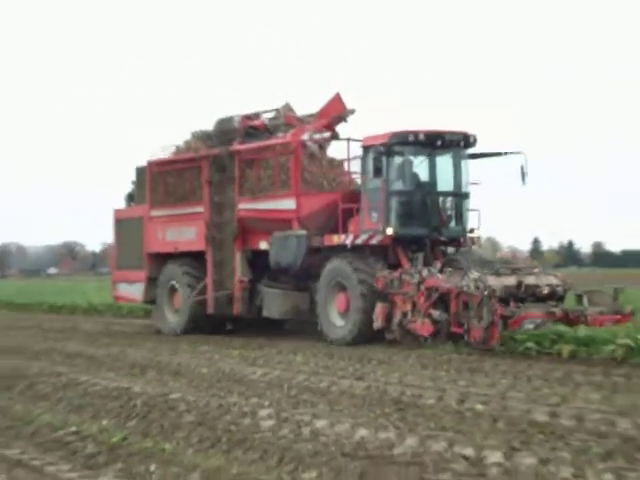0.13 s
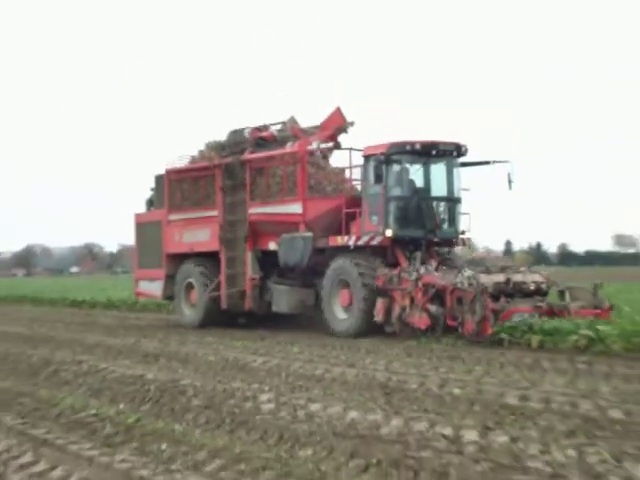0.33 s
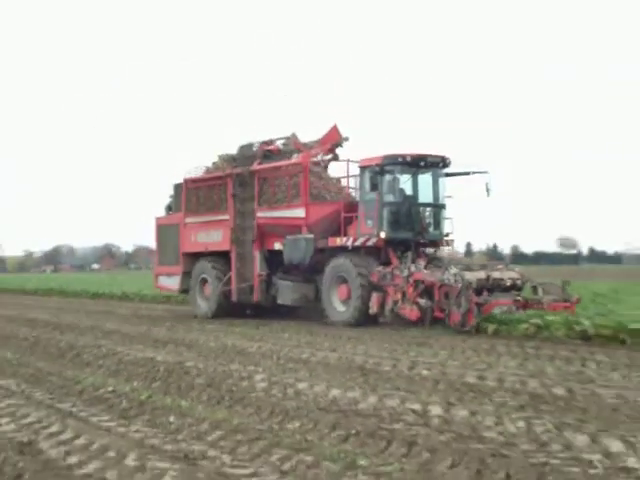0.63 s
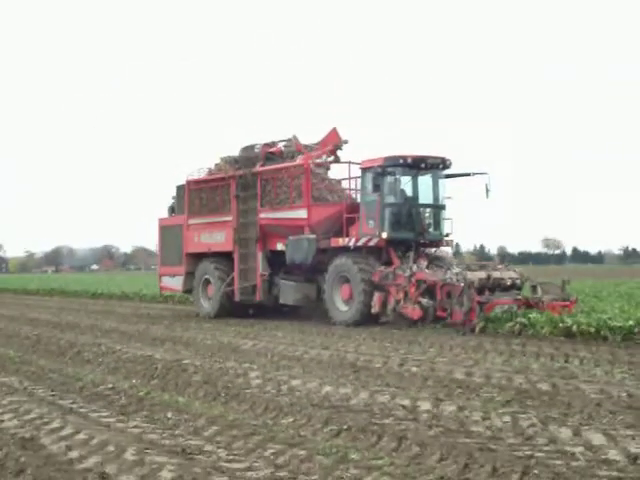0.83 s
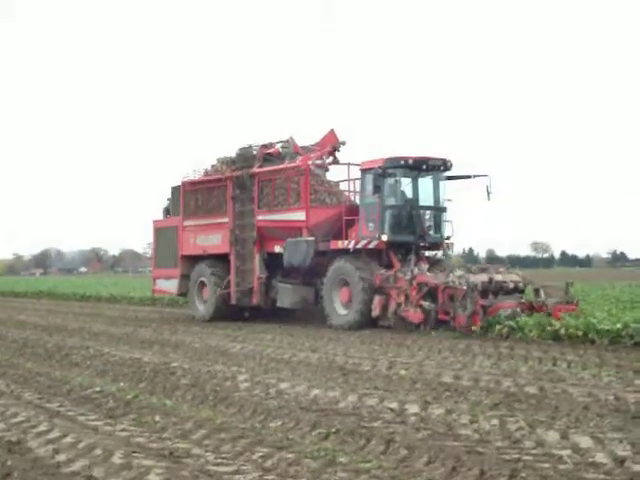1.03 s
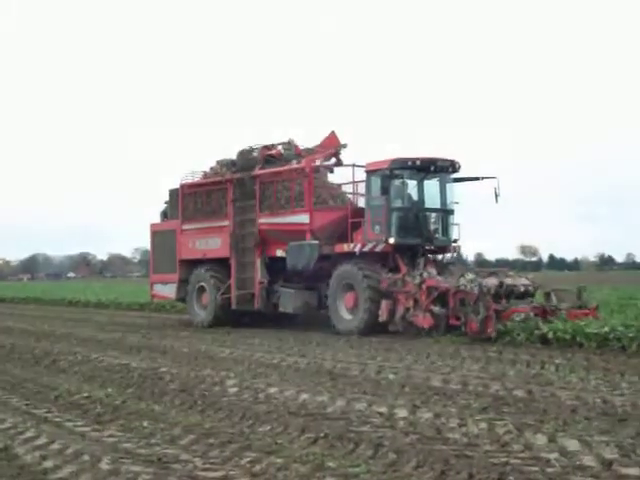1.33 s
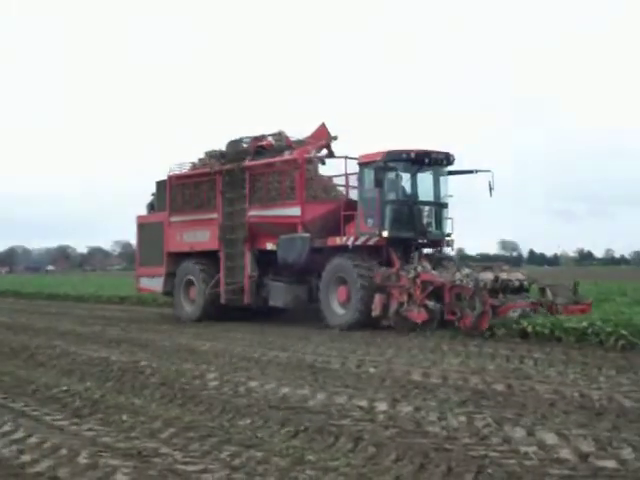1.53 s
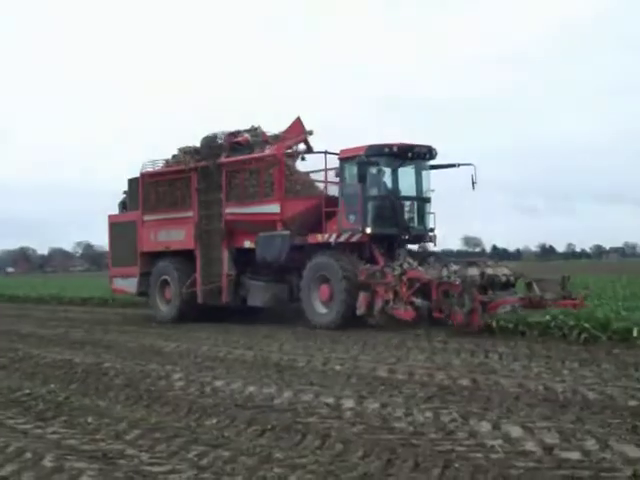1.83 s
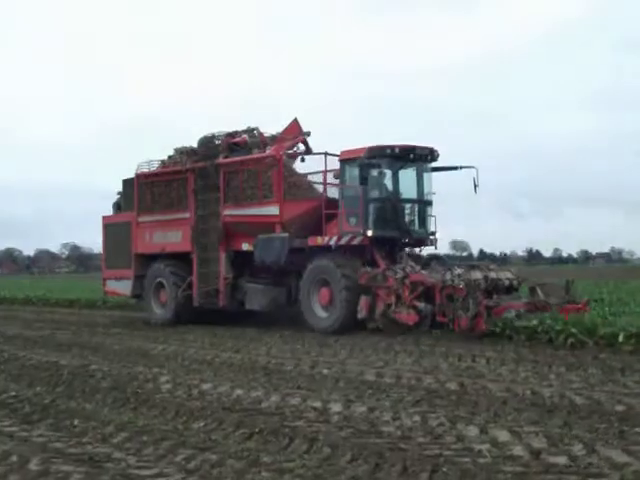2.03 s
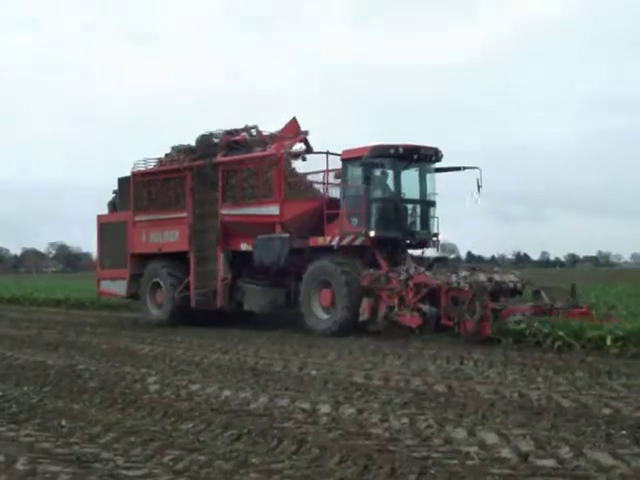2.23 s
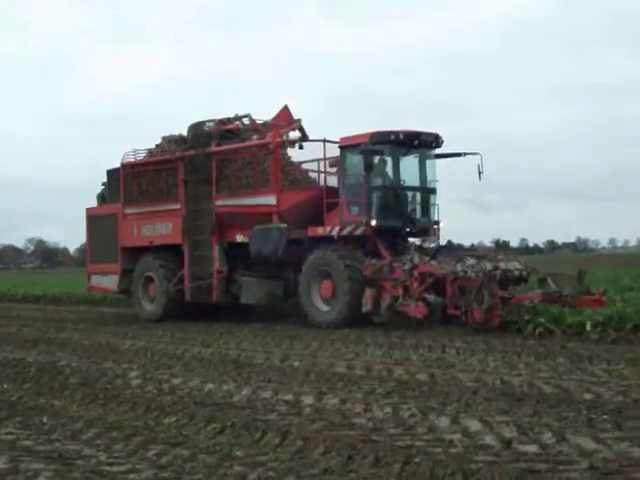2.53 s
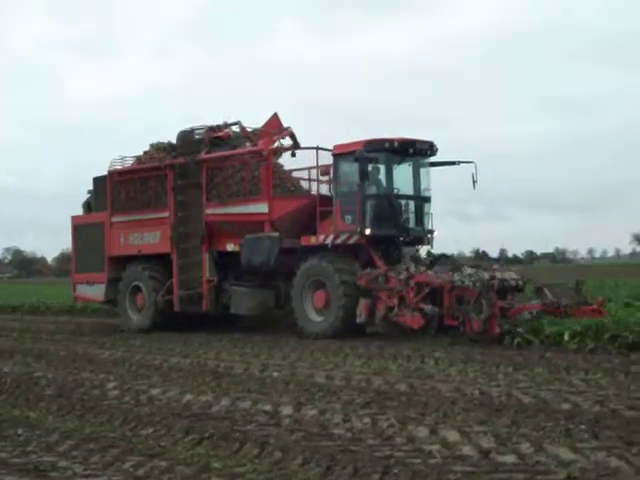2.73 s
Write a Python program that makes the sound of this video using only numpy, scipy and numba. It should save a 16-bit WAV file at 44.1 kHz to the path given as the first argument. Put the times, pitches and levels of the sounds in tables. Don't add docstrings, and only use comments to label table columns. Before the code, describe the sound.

Steady harvester machinery roar with diesel whine and fine clatter, battered by rumbling wind gusts

```python
import sys
import numpy as np
from scipy import signal
from scipy.fft import rfft, irfft, next_fast_len
from scipy.io import wavfile
from scipy.ndimage import uniform_filter1d, map_coordinates
from numba import njit

SR = 44100
rng = np.random.default_rng(int(sys.argv[2]) if len(sys.argv) > 2 else 0)


def wav_record(signal):
    frames = np.transpose(np.atleast_2d(signal))
    bounded = np.clip(frames, -1, 1)
    quanta = np.round(bounded * 32767).astype(np.int16)
    wavfile.write(sys.argv[1], SR, quanta)


def amplitude_ratio(level_db):
    exponent = np.asarray(level_db, float) / 20
    return 10 ** exponent


N = 126567

FIRING_HZ = 71.4


def unit(x):
    return x / np.sqrt(np.mean(x ** 2) + 1e-20)


def along(points, hz):
    point_hz, value = np.transpose(points)
    return np.interp(np.log(hz + 1), np.log(point_hz + 1), value)


def over_time(points):
    return np.interp(np.arange(N) / SR, *np.transpose(points))


def wobble(rate_hz):
    knots = rng.standard_normal(int(N * rate_hz / SR) + 4)
    return map_coordinates(knots, [np.arange(N) * rate_hz / SR])


def coloured(x, points):
    size = next_fast_len(N + 8192)
    gain = amplitude_ratio(along(points, np.fft.rfftfreq(size, 1 / SR)))
    return irfft(rfft(x, size) * gain, size)[:N]


def turns(hz):
    # time_s [s], speed [ratio to normal]
    engine_speed = [
        (0, .999),
        (.5, 1),
        (1.2, 1.003),
        (1.5, .999),
        (2.87, .997),
    ]
    return np.cumsum(hz * over_time(engine_speed)) / SR


def tone(hz, level_db):
    wander, flutter_db = 0.0025, 2.5
    phase = turns(hz) + np.cumsum(hz * wander * wobble(12)) / SR + rng.random()
    level = amplitude_ratio(level_db + flutter_db * wobble(9))
    return np.sqrt(2) * level * np.sin(2 * np.pi * phase)


def roar():
    # pitch_hz [Hz], level_db [dB per Hz]
    roar_spectrum = [(120, -9.5), (300, -21), (420, -26.5), (560, -9.5), (1000, -11), (1600, -11.5),
                     (2400, -9.5), (6000, -14.5)]
    level_db, throb_depth, patchy_db = -24.5, 0.021, 2.05
    cells = signal.stft(rng.standard_normal(N), nperseg=512)[2]
    patches = uniform_filter1d(rng.standard_normal(cells.shape), 6, 0)
    patches = uniform_filter1d(patches, 8, 1)
    noise = signal.istft(cells * amplitude_ratio(patchy_db * unit(patches)), nperseg=512)[1][:N]
    throb = 1 + throb_depth * np.cos(2 * np.pi * turns(FIRING_HZ))
    return amplitude_ratio(level_db) * unit(coloured(noise * throb, list(roar_spectrum) + [(9000, -57)]))


def clatter(count=600):
    knocks_per_s, centre_hz, level_db = 160, 2376, -33
    draw = rng.random((count, 3))
    k = np.arange(200)
    start = (np.cumsum(-np.log(draw[:, 0])) / knocks_per_s * SR).astype(int)
    at = start[:, None] + k
    cycles = centre_hz * np.exp(1.52 * (draw[:, 1:2] - 0.5)) * k / SR
    ring = np.sin(2 * np.pi * cycles) * np.exp(-cycles / 0.61)
    grains = amplitude_ratio(7.5 * draw[:, 2:]) * ring
    return amplitude_ratio(level_db) * unit(np.bincount(at.ravel(), grains.ravel(), N)[:N])


def whines():
    # order [multiple of firing rate], level_db [dB]
    firing_orders = [(1, -23), (2, -29), (4, -37.5), (8, -41.5), (12, -42), (16, -42)]
    # order [multiple of pump rate], level_db [dB]
    pump_orders = [(1, -32), (2, -41), (3, -45.5), (9, -46)]
    # pitch_hz [Hz], level_db [dB]
    gear_meshes = [(468, -43), (518, -37), (603, -43), (899, -44.5), (909, -41.5), (1063, -41),
                   (1215, -41.5)]
    # time_s [s], level_db [dB]
    strained_pump = [
        (0, -43.5),
        (.8, -40),
        (1.351, -41),
        (1.599, -53),
        (2.87, -46.5),
    ]
    pump_hz, strained_hz = 270.1, 3244
    lines = [(FIRING_HZ * round(order), db) for order, db in firing_orders]
    lines += [(pump_hz * round(order), db) for order, db in pump_orders]
    lines += list(gear_meshes)
    steady = sum(tone(hz, db) for hz, db in lines)
    return steady + tone(strained_hz, over_time(strained_pump))


def wind():
    # centre_s [s], strength_db [dB over lull], half_length_s [s]
    gusts = [(0.039, 17.5, 0.067), (0.229, 8, 0.039), (0.3, 16, 0.0093), (0.37, 11, 0.024),
             (0.496, 7, 0.072), (0.606, 10.5, 0.021), (0.724, 6, 0.033), (0.89, 3.5, 0.036),
             (0.947, 8, 0.036), (1.042, 3.5, 0.008), (1.198, 1.5, 0.083), (1.257, 5, 0.012),
             (1.289, 17.5, 0.0051), (1.38, 12.5, 0.023), (1.413, -1.5, 0.0057), (1.459, 12.5, 0.059),
             (1.581, 14, 0.029), (1.679, 12, 0.029), (1.752, 11.5, 0.013), (1.82, 6.5, 0.006),
             (1.886, 1, 0.085), (1.982, 7, 0.026), (2.056, 9.5, 0.02), (2.164, 7.5, 0.04),
             (2.328, 9.6, 0.063), (2.502, 10.5, 0.016), (2.59, 7.5, 0.023), (2.771, 15.5, 0.041),
             (2.86, 14.5, 0.0068)]
    # [dB, negative falls, positive rises]
    lulls = [(.03, -15.5), (0.579, -0.5), (.685, -1.5), (0.811, -4), (1.295, -7), (1.399, -9.5),
             (1.442, -9), (1.498, -3), (1.537, -11), (1.634, -5.5), (1.726, -5.5), (1.79, -3), (2.1, 2),
             (2.452, -3), (2.823, 3.5)]
    # pitch_hz [Hz], level_db [dB per Hz]
    buffet_spectrum = [(5.9, -23), (10, -2.5), (27, 6), (69, -3), (184, -21), (275, -23), (317, -29.5),
                       (450, -39), (580, -62.5), (990, -120)]
    lead_s, growth, narrowing = 0.0092, 0.84, 0.65
    lull_half_s, lull_db = 0.009, -12
    evenness, lump_db = 0.61, 0.5
    t = np.arange(N) / SR + lead_s
    power = 1
    for centre_s, db, half_s in gusts:
        power = power + (amplitude_ratio(2 * db) - 1) * np.exp(-((t - centre_s) / (narrowing * half_s)) ** 2 / 2)
    power = power ** growth
    drop_db = sum(db * np.exp(-((t - centre_s) / lull_half_s) ** 2 / 2) for centre_s, db in lulls)
    spectrum = [(3.3, -43.5)] + list(buffet_spectrum) + [(900, -53)]
    rumble = unit(coloured(rng.standard_normal(N), spectrum))
    swell = uniform_filter1d(np.abs(signal.hilbert(rumble, next_fast_len(N))[:N]), size=400)
    evened = unit(rumble / (swell + 0.3) ** evenness)
    return amplitude_ratio(lull_db + drop_db + lump_db * wobble(24.836)) * np.sqrt(power) * evened


def scene():
    return (roar() + clatter() + whines() + wind())[None]


@njit
def follow(x, up, down):
    out, e = np.empty_like(x), x[:800].max()
    for i in range(len(x)):
        e += (up if x[i] > e else down) * (x[i] - e)
        out[i] = e
    return out


def roll_off(x):
    return signal.sosfilt(signal.butter(12, 15850, fs=SR, output="sos"), x)


def record(dry):
    # pitch_hz [Hz], level_db [dB]
    mic_response = [(2700, -2.5), (3000, 1), (3250, 1), (3600, -8.5), (4200, -14), (5200, -25), (6000, -38),
                    (7000, -71)]
    attack_s, release_s, ratio, target_db = 0.0016, 0.011, 0.97, -6.5
    clip, headroom = 0.714, 1.019
    x = coloured(dry[0], mic_response)
    peak = follow(np.abs(x), 1 / (attack_s * SR), 1 / (release_s * SR))
    x = x * (amplitude_ratio(target_db) / (peak + 0.003)) ** ratio
    x = np.clip(x, -headroom * clip, headroom * clip)
    x = coloured(x, [(5500, 0), (7000, -41)])
    return roll_off(np.clip(x, -clip, clip)[None])


dry = scene()
out = record(dry)
wav_record(out)
```